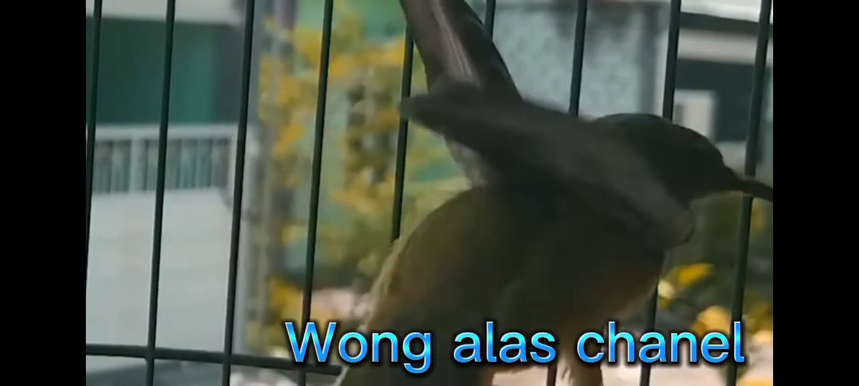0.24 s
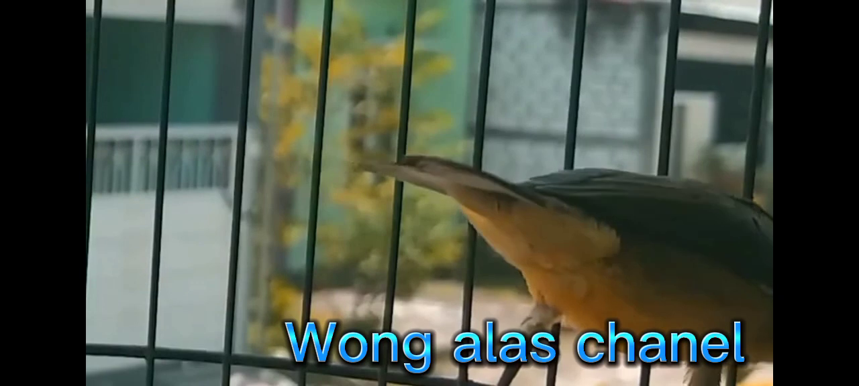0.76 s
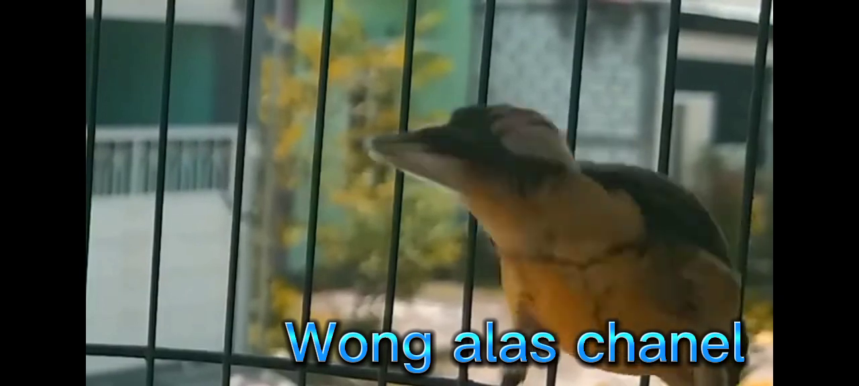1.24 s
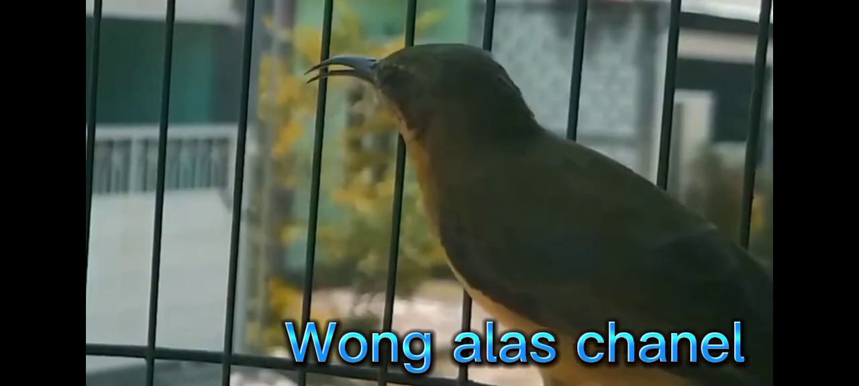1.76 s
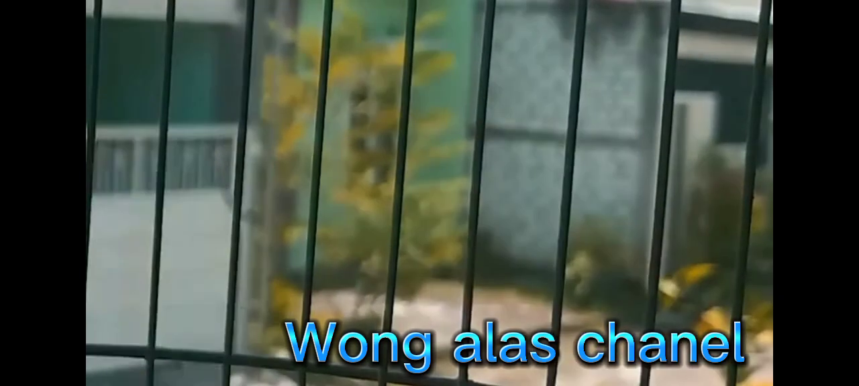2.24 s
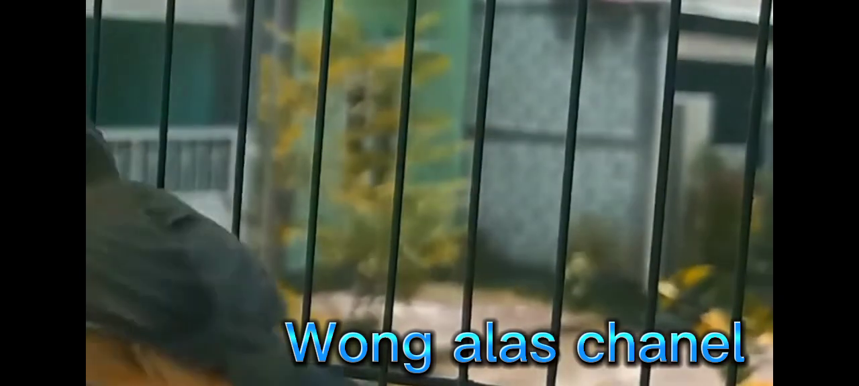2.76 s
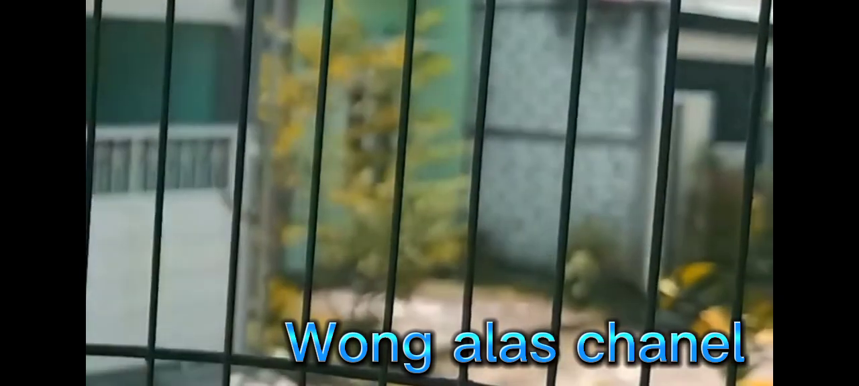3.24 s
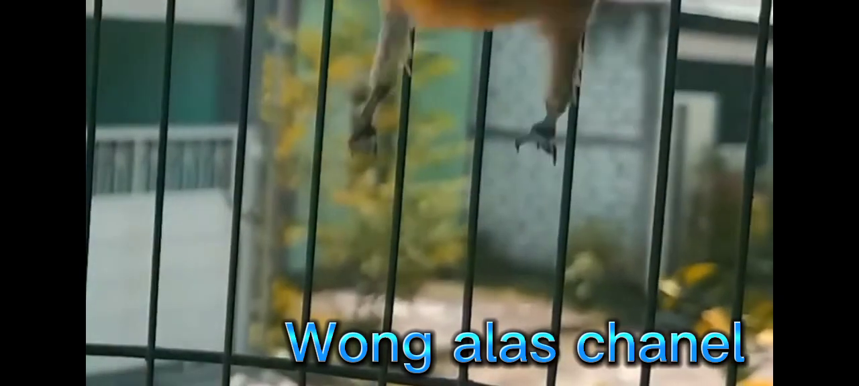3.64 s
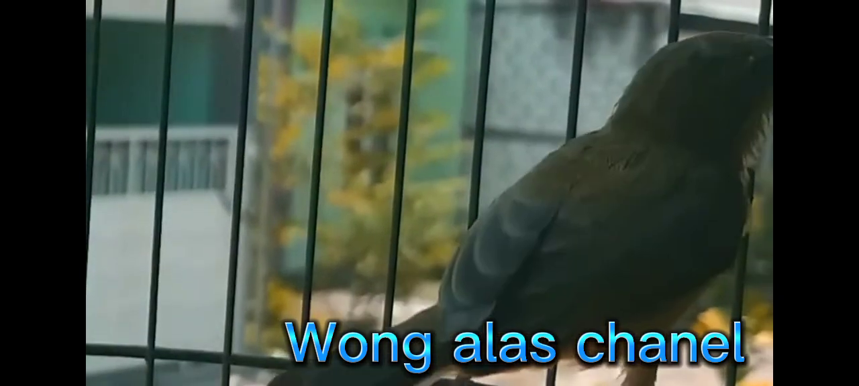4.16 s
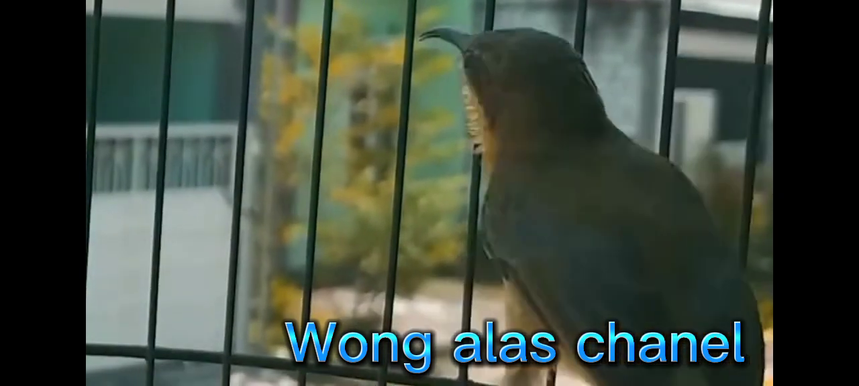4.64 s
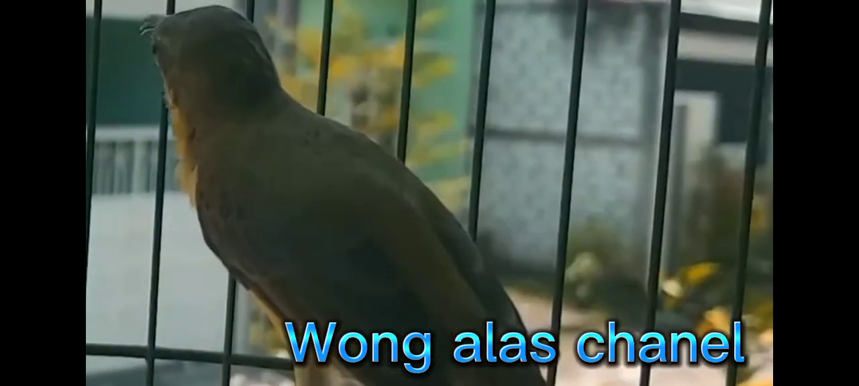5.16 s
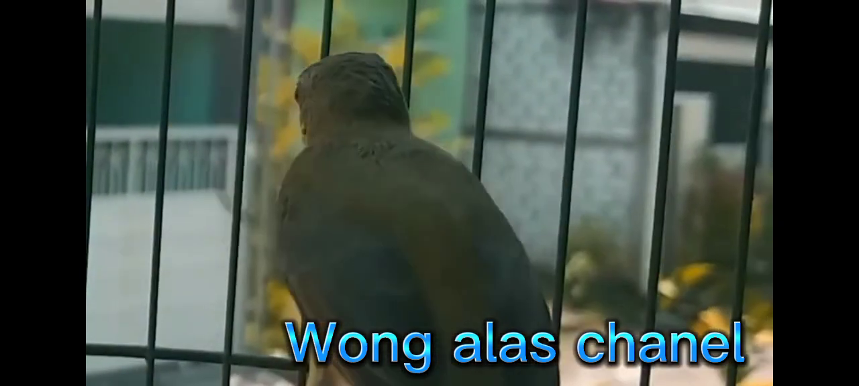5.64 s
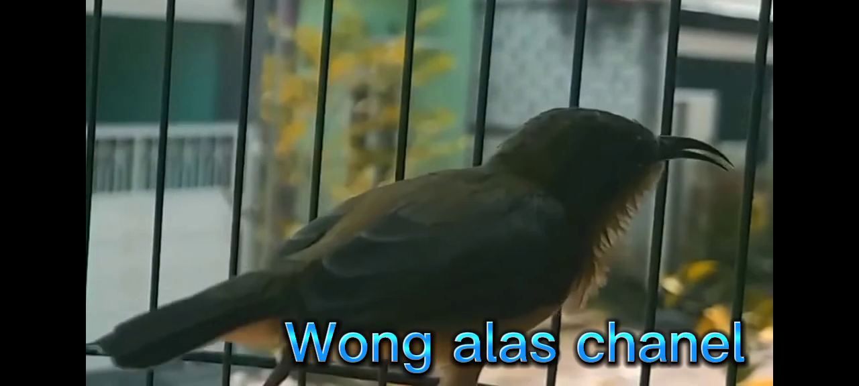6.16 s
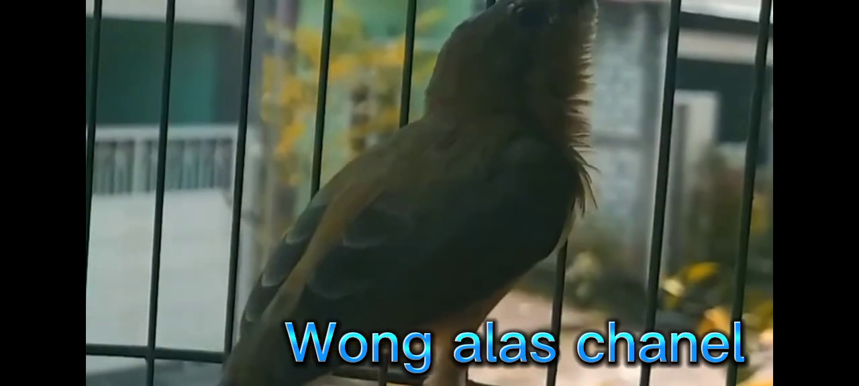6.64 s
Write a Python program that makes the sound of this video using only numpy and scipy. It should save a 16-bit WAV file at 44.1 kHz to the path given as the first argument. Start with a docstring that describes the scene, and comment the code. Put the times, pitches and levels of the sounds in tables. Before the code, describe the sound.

A small bird in a cage, close to the microphone, gives five short, bright, warbling chirps with pauses between, the first followed by little rasps and upsweeps. Soft wing thumps mark its hops. Then it rattles off fast, harsh chatter with a screech, dry bill snaps and buzzy trills, and ends on two slurred whistles and an airy squawk. The yard adds short echoes over faint hiss.

```python
"""Caged bird chirping and chattering

A small caged bird gives five sharp warbled chirps amid upsweeps and rasps, then a fast chatter with
buzzy trills, a screech, two whistles and a squawk. Its voice is a stack of sine waves mixed with rough noise.
Its bill snaps in short noise bursts, and its wings thump softly in low puffs of noise as it hops about.
The yard returns a short echo; a faint hiss, a low rumble and another bird's thin whistle lie behind."""
import sys
import numpy as np
from scipy import signal
from scipy.fft import rfft, irfft
from scipy.io import wavfile
from scipy.ndimage import uniform_filter1d, map_coordinates

SR = 44100
rng = np.random.default_rng(int(sys.argv[2]) if len(sys.argv) > 2 else 0)


def pcm_store(signal):
    """Save signal as 16-bit PCM."""
    levels = np.round(np.clip(np.atleast_2d(signal), -1, 1) * 32767)
    wavfile.write(sys.argv[1], SR, levels.astype(np.int16).T)


N = 303849
TIME = np.arange(N) / SR

# Colour of harsh sounds, shared by the raspy voice and the bill. Each row: frequency in Hz, relative level in dB.
RASP_COLOUR = [(700, -75.5), (1400, -30.5), (2100, -8), (3000, -3), (4300, 9), (6100, 1), (7300, -10.5),
               (8100, -26.5), (9400, -5), (11700, -28.5), (15500, -19.5)]
# Colour of air rushing through the wide-open bill. Each row: frequency in Hz, relative level in dB.
AIR_COLOUR = [(2000, -27), (6000, 1.5), (9500, 0.5), (11000, -27), (13500, -4.5), (15500, -9)]


def caged_bird():
    """All the notes of the near bird, with little left below 1.5 kHz."""
    lowest_hz = 1500
    notes = chirps() + chatter() + screech() + whistles_and_squawk()
    bass_cut = signal.butter(5, lowest_hz, "high", fs=SR, output="sos")
    return signal.sosfilt(bass_cut, strung(notes))


def chirps():
    """Five loud, high notes, each with its own pitch, glide and warble."""
    # The chirps. Each row: start in seconds, length in seconds, base pitch in Hz, base level in dB,
    # glide in octaves, time of one warble crest in seconds, swings per second, depth as a share of the pitch,
    # lateness of the swell (1 = usual), overtone tilt in dB per octave.
    rows = [(0.239, 0.064, 5190, -24.5, .2, 0.26, 95, 0.11, 0.92, 10.5),
            (1.727, 0.07, 5445, -19.5, 0.11, 1.78, 83, 0.16, 0.96, 4),
            (2.163, 0.072, 5395, -18, -0.051, 2.25, 96, 0.13, 1.23, 4),
            (2.773, .075, 5716, -16, -0.05, 2.7955, 118, 0.16, 1.09, 1),
            (3.308, 0.072, 5277, -14, -0.028, 3.3345, 93, 0.11, 0.93, -3)]
    return [chirp(*row) for row in rows]


def chatter():
    """Rasps, buzzy trills, and upsweeps that break into a shriek."""
    # The rasps. Each row: start, attack, hold and release in seconds, starting pitch in Hz,
    # glide in octaves, level during the hold in dB, roughness (0 = clear, 1 = very rough).
    rasps = [(0.319, 0.0043, 0.0068, 0.02, 2960, 0.16, -36.5, 1.23),
             (0.383, 0.011, 0.011, 0.092, 2910, -0.0033, -39.5, 1),
             (3.438, 0.0036, 0.037, 0.024, 2074, -0.15, -40, 0.88),
             (4.364, 0.0024, 0.049, 0.0034, 1990, -0.045, -43, 0.75),
             (4.786, 0.0056, 0.04, 0.052, 2690, -0.069, -35, 0.9),
             (4.923, 0.0032, 0.0059, 0.012, 2190, -0.085, -40, 0.72),
             (4.933, 0.037, 0.031, 0.04, 2610, 0.15, -32, 0.88),
             (5.286, 0.0186, 0.0117, 0.0148, 2215, .5, -29, 0.72),
             (5.316, 0.015, .025, 0.078, 2700, -0.098, -37, 1.06),
             (5.504, 0.002, 0.02, 0.069, 2900, -0.31, -32.5, 1.01),
             (5.659, 0.032, 0.014, 0.03, 2225, 0.22, -31, 0.75)]
    # The trills. Each row: the same as for rasps, then swings per second, depth as a share of the pitch.
    trills = [(4.285, 0.038, 0.048, 0.0076, 4670, -0.39, -36.5, 0.26, 105, 0.25),
              (5.038, 0.083, 0.063, 0.19, 2365, 0.015, -38, 0.85, 87, 0.15),
              (5.711, 0.0084, 0.075, 0.016, 2132, -0.014, -35.5, 0.66, 92, 0.098),
              (5.796, 0.0068, 0.046, 0.0065, 2180, 0.17, -35, 0.42, 100, 0.065),
              (5.843, 0.0051, 0.014, 0.0089, 3450, 0.11, -34, 0.34, 107, 0.233),
              (5.868, 0.0027, 0.038, 0.015, 2300, 0.1, -32.5, 0.46, 94, .11)]
    # The upsweeps. Each row: time of the break in seconds, sweep length in seconds, foot in Hz, top in Hz,
    # bend of the glide, sweep level in dB at its end, shriek length in seconds, shriek starting pitch in Hz,
    # shriek starting level in dB, seconds until it frays, warble depth as a share of the pitch.
    upsweeps = [(0.367, 0.026, 1367, 3900, 2, -36, 0.036, 4344, -30, 0.006, 0.16),
                (0.504, 0.038, 1314, 4210, 2, -38, 0.061, 3770, -42, 0.0049, 0.13),
                (3.476, 0.012, 1625, 2890, 0.89, -19.5, 0.075, 3100, -28.5, 0.02, 0.16),
                (3.846, .038, 1076, 2710, 1.34, -29, 0.063, 3250, -29.5, 0.015, 0.11),
                (3.969, 0.062, 1102, 2840, 5.3, -37.5, 0.06, 5500, -26, 0.009, 0.087),
                (4.056, 0.052, 1486, 2437, 1.5, -29, 0.0617, 3750, -27, 0.0196, 0.036),
                (4.517, 0.03, 955, 2810, 1.6, -26, 0.05, 5400, -22.5, 0.015, 0.019),
                (4.628, 0.045, 1442, 2790, 3.4, -31, 0.066, 3750, -28.5, 0.017, 0.13)]
    notes = [buzz(*row) for row in rasps + trills]
    for break_s, length, foot_hz, top_hz, bend, db, *after in upsweeps:
        notes.append(upsweep(break_s, length, foot_hz, top_hz, bend, db))
        notes.append(shriek(break_s, *after))
    return notes


def screech():
    """A screech in which both sides of the syrinx (the voice organ) sound, then a snarl."""
    # The screech's path. Each row: time in seconds, pitch in Hz, level in dB, roughness from 0 to 1.
    lower = [(4.156, 3850, -35.5, 0.4), (4.16, 3970, -27.5, 0.29), (4.174, 3450, -30, 0.48),
             (4.186, 2550, -31, 0.3), (4.196, 2080, -45, 1)]
    # The snarl's path. Each row: time in seconds, pitch in Hz, level in dB, roughness (1 = very rough).
    snarl = [(4.196, 1950, -39.5, .7), (4.245, 2550, -26.5, 0.78), (4.272, 2683, -31, 0.88),
             (4.286, 2430, -44, 1.3)]
    air_db, doubling = -28.5, 0.28  # air relative to the voice; strength of the half orders
    second_ratio, second_db = 1.2, -5.5  # the second side sounds a little higher and softer
    upper = [(s, hz * second_ratio, db + second_db, rough) for s, hz, db, rough in lower]
    notes = [slur(curve, air_db, doubling, tilt_db=4) for curve in (lower, upper)]
    notes.append(slur(snarl, air_db, doubling, tilt_db=-6.5))
    return notes


def whistles_and_squawk():
    """Two slurred whistles and a closing squawk, which has far more air in it."""
    # Paths of the three notes. Each row: time in seconds, pitch in Hz, level in dB, roughness from 0 to 1.
    long_whistle = [(6.0, 4790, -32.5, 0.88), (6.014, 3220, -30, 0.35), (6.046, 2690, -39.5, .6),
                    (6.08, 3160, -44, 0.17), (6.096, 2535, -23, .02), (6.184, 2598, -26.5, .02),
                    (6.192, 3440, -36, .3), (6.214, 3210, -35, .1), (6.228, 5150, -22, .02),
                    (6.244, 5410, -15.5, 0.021), (6.252, 6070, -23, 0.057), (6.279, 5410, -20.5, .05)]
    short_whistle = [(6.351, 2726, -40, 0.95), (6.371, 2776, -32, 0.54), (6.386, 3180, -43, 0.31),
                     (6.404, 2540, -36.5, 0.2), (6.415, 3600, -40, 0.077), (6.424, 4750, -23.5, 0.018),
                     (6.459, 5600, -17, 0.14), (6.474, 5700, -19.5, 0.32), (6.485, 4300, -38, 0.22)]
    squawk = [(6.582, 1648, -49, 0.59), (6.592, 1800, -29.5, 0.42), (6.607, 1937, -29, 0.45),
              (6.622, 2233, -26.5, 0.43), (6.638, 2780, -23.5, 0.25), (6.657, 2665, -32.5, 0.81),
              (6.669, 2670, -24.5, 0.12), (6.698, 2630, -27, 0.42), (6.736, 1726, -29.5, 0.32),
              (6.77, 1414, -47, 0.58)]
    whistles = (long_whistle, short_whistle)
    notes = [slur(curve, air_db=-34, doubling=0.54, tilt_db=-4.5) for curve in whistles]
    notes.append(slur(squawk, air_db=-17.5, doubling=0.52, tilt_db=-2))
    return notes


def chirp(start, length, hz, db, glide, crest, per_s, depth, lateness, tilt_db):
    """A note that starts hoarse, swells and flicks up; the syrinx pinches after each low of its slowing warble."""
    # Shape of every chirp. Each row: share of its length, pitch ratio, added level in dB, roughness from 0 to 1.
    shape = [(0, 1.08, -31, 0.9), (.17, 1.1, -13, 0.48), (0.332, 1.006, -2.5, 0.26), (0.582, 0.99, 1, 0.05),
             (0.739, 1.186, -3, 0.13), (1.001, 1.05, -11, 0.25)]
    air_db = -28.5  # relative to the chirp
    pinch_db, pinch_lag_s = 11.5, .0006
    t, u = clock(start, length)
    share, ratio, arch_db, rough = np.transpose(shape)
    pitch = hz * np.interp(u, share, ratio) * 2 ** (glide * (u - .5))
    level_db = db + np.interp(u ** lateness, share, arch_db)
    swing = warble(t, crest, per_s, depth, fading=0.38, slowing_per_s=5.5)
    late_swing = np.interp(t - pinch_lag_s, t, swing)
    widest = np.abs(swing[len(t) // 3:]).max()
    trough = np.clip(-late_swing / widest, 0, 1)
    roughness = np.interp(u, share, rough)
    start, voice = syllable(t, pitch, level_db, roughness, swing, tilt_db, tremor=0.011, throb_db=6.5)
    pinch = amp(-pinch_db * trough ** 4)
    air = amp(level_db + air_db) * noise(AIR_COLOUR, len(t))
    return start, voice * pinch + air


def upsweep(end, length, foot_hz, top_hz, bend, db):
    """A stack of overtones that climbs to the break, swelling and clearing on the way."""
    start_db, hoarse, clear = -48, 0.78, 0.19
    t, u = clock(end - length, length + .002)  # runs 2 ms into the shriek
    pitch = foot_hz + (top_hz - foot_hz) * u ** bend
    level_db = start_db + (db - start_db) * u
    rough = clear + (hoarse - clear) * (1 - u) ** 2
    return syllable(t, pitch, level_db, rough, 0, tilt_db=-9.0, doubling=0.67)


def shriek(start, length, hz, db, clear_s, depth):
    """After the break the voice jumps up, glides toward a final pitch, fades and frays into a rasp."""
    end_hz, glide_s, fade_db, swings_per_s = 5470, .023, 21, 120
    first_rough, fray_s = .35, .008
    t, u = clock(start, length)
    pitch = end_hz + (hz - end_hz) * np.exp(-((t - start) / glide_s) ** 2)
    rough = np.interp(t - start - clear_s, [-fray_s, fray_s], [first_rough, 1])
    swing = -warble(t, start, swings_per_s, depth)
    return syllable(t, pitch, db - fade_db * u ** 2, rough, swing, tilt_db=-7.5, throb_db=-3)


def buzz(start, attack, hold, release, hz, glide, db, rough, per_s=0, depth=0):
    """A harsh note; roughness makes its pitch tumble about, and weak blowing makes a rough one rattle."""
    rise_db, fall_db = 16, 23
    rattle_db, rattles_per_s, rattle_below_db = 4, 380, -35
    tumble, tumbles_per_s = .06, 230  # tumble as a share of the pitch
    slip_s = 0.00142  # unevenness of the warble's timing
    corners = start + np.cumsum([0, attack, hold, release])
    t, u = clock(start, corners[-1] - start)
    level_db = db - np.interp(t, corners, [rise_db, 0, 0, fall_db])
    weakness = np.clip((rattle_below_db - level_db) / 10, 0, 1)
    rattle = rattle_db * weakness * wander(t, rattles_per_s)
    uneven_time = t + slip_s * rough * wander(t, 70)
    swing = warble(uneven_time, start, per_s, depth) + tumble * rough * wander(t, tumbles_per_s)
    pitch = hz * 2 ** (glide * u ** 2)
    return syllable(t, pitch, level_db + rough * rattle, rough, swing, tilt_db=-13.5 + 14.1 * rough,
                    doubling=0.52, throb_db=26 * (1 - rough))


def slur(curve, air_db, doubling, tilt_db, quiver_per_s=75, quiver=0.019):
    """A gliding note that slips between clear and hoarse, with a slight quiver and a rush of air."""
    s, *columns = np.transpose(curve)
    t, _ = clock(s[0], s[-1] - s[0])
    hz, level_db, rough = (np.interp(t, s, c) for c in columns)
    swing = warble(t, s[0], quiver_per_s, quiver)
    start, voice = syllable(t, hz, level_db, rough, swing, tilt_db, tremor=0.015, doubling=doubling)
    return start, voice + amp(level_db + air_db) * noise(AIR_COLOUR, len(t))


def syllable(t, hz, level_db, rough, swing, tilt_db, tremor=0.0157, doubling=0.89, throb_db=26, flutter_db=1):
    """Overtones through the throat; a voice pushed hard doubles its period, then breaks into a rasp."""
    # How the throat and open bill favour each pitch. Each row: frequency in Hz, relative level in dB.
    throat = [(1200, -48.5), (1800, -16.5), (2600, -14.5), (3500, 4), (5200, 13.5), (6800, 3), (8300, -5.5),
              (10300, -13), (11700, -25.5), (13200, -23), (15500, -31.5)]
    rough = np.clip(rough, 0, 1)
    # a rough syrinx lurches in pitch from moment to moment
    lurch = rough * (.04 * wander(t, 2200) + .12 * rough ** 2 * wander(t, 300))
    hz = hz * (1 + swing + lurch + tremor * wander(t, 900))
    phase = 2 * np.pi * np.cumsum(hz) / SR
    k = np.arange(2, 15)[:, None] / 2  # orders 1 to 7 in half steps

    # the partials vary in strength, the more so the rougher the voice
    unrest_db = (2 + 4 * rough) * np.array([wander(t, 330) for _ in k])
    # soft, clear singing loses its upper partials
    slope_db = tilt_db + .9 * (1 - rough) * np.minimum(level_db + 31, 0)
    height_db = read(throat, k * hz) + slope_db * np.log2(k) + unrest_db
    height = amp(height_db) * (k * hz < SR / 2)
    # half orders between the harmonics grow with roughness
    half_orders = doubling * np.clip(4 * rough - 1, 0, 1)
    height *= np.where(k % 1, half_orders, 1)

    # the partials slip out of step, which smears them in a rough voice
    slip = np.array([2 * np.pi * rng.random() + .9 * rough ** 2 * wander(t, 600) for _ in k])
    partials = height * np.sin(k * phase + slip)
    tone = np.sqrt(2) * partials.sum(0) / np.linalg.norm(height, axis=0)
    airy = .62 * rough ** 2
    voice = np.sqrt(1 - airy ** 2) * tone + airy * rasp(t, swing)
    voice = voice * sputter(t, rough)

    # soft edges: 2 ms in, 4 ms out
    ramp = np.clip(np.minimum((t - t[0]) / .002, (t[-1] - t) / .004), 0, 1)
    edges = np.sin(np.pi / 2 * ramp) ** 2
    # the level follows the pitch swings 1 ms late
    throb = np.interp(t - .001, t, swing * np.ones(len(t)))
    return t[0], voice * edges * amp(level_db + throb_db * throb + flutter_db * wander(t, 250))


def rasp(t, swing, grain_db=3, ripple_db=5.0):
    """Irregular puffs through the throat; their tone colour differs each time and rides the pitch swings."""
    puffs = rng.standard_normal(2 * len(t))
    hz = np.linspace(0, SR / 2, num=64)
    ripple = np.column_stack([hz, ripple_db * rng.standard_normal(len(hz))])
    coloured = colour(colour(puffs, ripple), RASP_COLOUR)
    # playing the noise faster or slower moves its peaks up or down
    speed = (1 + swing / 2) * np.ones(len(t))
    moving = map_coordinates(coloured, [np.cumsum(speed)], order=5, mode="mirror")
    return evened(moving * amp(grain_db * wander(t, 500)))


def sputter(t, rough):
    """A very rough syrinx opens in irregular pulses, each sharp at the front and dying away."""
    pulses_per_s, depth_db, jitter = 260, 13, .55
    rate = pulses_per_s * np.exp(jitter * wander(t, pulses_per_s))
    turns = np.cumsum(rate) / SR
    strength = np.clip(2 * rough - 1, 0, 1)
    pulses = amp(depth_db * strength * (.4 - turns % 1))
    return uniform_filter1d(pulses, size=18)


def warble(t, crest, per_s, depth, fading=0.17, slowing_per_s=0):
    """The syrinx muscles swing the pitch; the swings grow shallower and may slow down."""
    since = t - crest
    shrinking = depth * np.linspace(1, 1 - fading, len(t))
    return shrinking * np.cos(2 * np.pi * per_s * since * (1 - slowing_per_s * since))


def bill(t60=0.045):
    """The bill shuts with short dry snaps: noise that falls by 60 dB in t60 seconds, coloured like the rasp."""
    # The snaps. Each row: time in seconds, starting level in dB before colouring.
    snaps = [(4.157, -35), (4.755, -37.5), (5.487, -37), (5.635, -39)]
    out, t = np.zeros(N), TIME[:2048]
    for s, db in snaps:
        add(out, s, rng.standard_normal(len(t)) * amp(db - 60 * t / t60))
    return colour(out, RASP_COLOUR)


def wings():
    """Each stroke or hop pushes a soft low puff of air."""
    # The strokes and hops. Each row: time of the peak in seconds, peak level in dB, length in seconds.
    puffs = [(2.21, -69.5, 0.06), (2.81, -64, 0.055), (3.349, -48, 0.08), (3.473, -53.5, 0.041)]
    # Colour of the puffs. Each row: frequency in Hz, relative level in dB.
    puff_colour = [(25, -34), (60, -1.5), (140, -6.5), (800, -29), (3000, -34.5)]
    strokes = sum(amp(db) * np.exp(-2 * ((TIME - s) / length) ** 2) for s, db, length in puffs)
    return strokes * noise(puff_colour, N)


def other_bird():
    """The thin whistle of a bird further off."""
    # Its notes. Each row: start in seconds, length in seconds, starting pitch in Hz, peak level in dB before echo.
    notes = [(0.04, 0.11, 4120, -57.5), (0.61, 0.13, 4196, -52)]
    return strung([far_whistle(*row) for row in notes])


def far_whistle(start, length, hz, db):
    """A nearly pure note that swells early, sags in pitch and fades."""
    sag, fade_db, rough, peak_at = 0.012, 25, 0.14, 0.19  # sag and peak as shares of pitch and length
    t, u = clock(start, length)
    return syllable(t, hz * (1 - sag * u), db - fade_db * abs(u - peak_at), rough, 0, tilt_db=-34)


def yard(x, tail_db=-19.0, near_db=-13.5, near_t60=0.2, build_s=0.0094, wall_db=-16):
    """Quick reflections from around the cage, then a weaker, longer tail; both are decaying noise."""
    # How the tail dies away. Each row: frequency in Hz, seconds to fall by 60 dB.
    decay = [(2800, 0.16), (5700, 0.48), (15000, 0.67)]
    hz, t, z = signal.stft(rng.standard_normal((2, SR)), SR, nperseg=256)
    far_fade = amp(-60 * t / read(decay, hz)[:, None])
    near_fade = amp(-60 * t / near_t60) * np.minimum(t / build_s, 1)
    far = signal.istft(z[0] * far_fade, SR, nperseg=256)[1]
    near = signal.istft(z[1] * near_fade, SR, nperseg=256)[1]
    echo = amp(tail_db) * far / np.linalg.norm(far) + amp(near_db) * near / np.linalg.norm(near)
    echo[0] += amp(wall_db)  # the nearest wall answers first, and beats against the gliding pitch
    delay = np.zeros(round(0.002 * SR))
    return signal.fftconvolve(x, np.concatenate([delay, echo]))[:N]


def background(throb_db=3.0, unrest_db=1.54):
    """A low rumble, and a faint patchy hiss that throbs at first while it is bright."""
    # How the hiss changes. Each row: time in seconds, level in dB, brightness from 0 to 1.
    hiss_course = [(0, -59, 0.12), (.85, -63.5, 0.9), (1.7, -64.5, .85), (2.11, -68.5, 1),
                   (2.549, -59.5, 0.77), (2.8, -71.5, 0.98), (2.98, -57, 0), (3.781, -62.5, 0),
                   (4.1, -66, 0)]
    # Colours of the bright hiss, dull hiss and rumble. Each row: frequency in Hz, relative level in dB.
    bright_colour = [(1000, -28.5), (2300, -13), (6800, -0.5), (10500, -13.5), (15000, -40.5)]
    dull_colour = [(1300, -35), (2200, -11), (3600, -1), (4900, -3.5), (6200, -15.5), (15000, -37)]
    rumble_colour = [(20, -39.5), (100, -2), (270, -18.5), (1200, -23), (3000, -34.5)]
    rumble_db = -77
    throbs_per_s, throbs_end_s = 8.57, 1.8
    s, *columns = np.transpose(hiss_course)
    level_db, bright = (np.interp(TIME, s, c) for c in columns)
    bright = np.clip(bright, 0, 1)
    bright_hiss = np.sqrt(bright) * patchy(noise(bright_colour, N))
    dull_hiss = np.sqrt(1 - bright) * patchy(noise(dull_colour, N))
    throb = throb_db * bright * np.cos(2 * np.pi * throbs_per_s * TIME) * (TIME < throbs_end_s)
    hiss = (bright_hiss + dull_hiss) * amp(level_db + throb + unrest_db * wander(TIME, 55))
    return hiss + amp(rumble_db) * noise(rumble_colour, N)


def patchy(x, patch_db=3):
    """Lets narrow bands of a hiss come and go by themselves."""
    z = signal.stft(x, nperseg=1024)[2]
    over_pitch = uniform_filter1d(rng.standard_normal(z.shape), size=5, axis=0)
    patches = evened(uniform_filter1d(over_pitch, size=9, axis=1))
    return evened(signal.istft(z * amp(patch_db * patches), nperseg=1024)[1][:len(x)])


def amp(db):
    """Turns decibels into a gain."""
    return 10 ** (np.asarray(db) / 20)


def evened(x):
    """Scales a sound to an average strength (rms) of 1."""
    return x / np.sqrt(np.mean(x ** 2) + 1e-20)


def read(points, hz):
    """Reads a table of values between its points, on a log-frequency axis."""
    f, value = np.transpose(points)
    return np.interp(np.log(hz + 1), np.log(f + 1), value)


def colour(x, spectrum):
    """Filters a sound by a spectrum."""
    gain = amp(read(spectrum, np.fft.rfftfreq(len(x), 1 / SR)))
    return irfft(rfft(x) * gain, len(x))


def noise(spectrum, size):
    """Noise of rms 1 with the given spectrum."""
    return evened(colour(rng.standard_normal(size), spectrum))


def wander(t, per_s):
    """A random curve that heads for a new value per_s times a second."""
    knots = rng.standard_normal(4096)
    return map_coordinates(knots, [(t - t[0]) * per_s], order=1, mode="wrap")


def clock(start, length):
    """Sample times of a syllable, and its progress from 0 to 1."""
    t = np.arange(start, start + length, 1 / SR)
    return t, np.linspace(0, 1, len(t))


def add(mix, s, sound):
    """Mixes a sound in at time s."""
    part = mix[max(round(s * SR), 0):][:len(sound)]
    part += sound[:len(part)]


def strung(syllables):
    """Places syllables at their start times."""
    out = np.zeros(N)
    for s, sound in syllables:
        add(out, s, sound)
    return out


def scene(neighbour_echo_db=16):
    """The near bird, its neighbour, which is heard mostly by its echo, the yard and the background."""
    bird = caged_bird() + bill()
    neighbour = other_bird()
    echo = yard(bird + amp(neighbour_echo_db) * neighbour)
    return (bird + neighbour + echo + wings() + background())[None]


def record(dry):
    """Cuts off the very highest treble."""
    edge_hz = 15800
    treble_cut = signal.firwin(511, edge_hz, window=("kaiser", 9), fs=SR)
    return signal.oaconvolve(dry, treble_cut[None], "same")


dry = scene()
out = record(dry)
pcm_store(out)
```